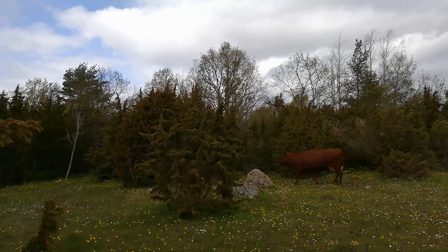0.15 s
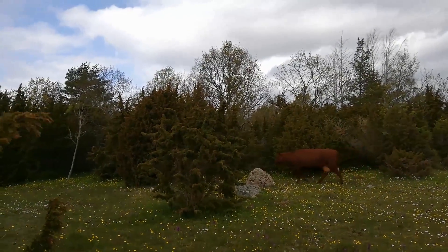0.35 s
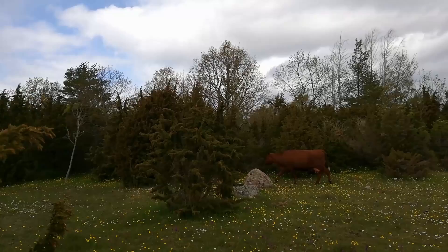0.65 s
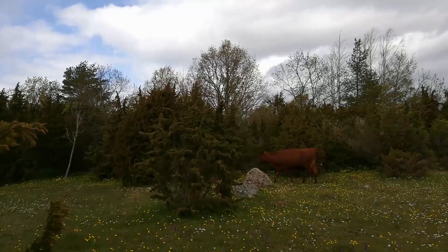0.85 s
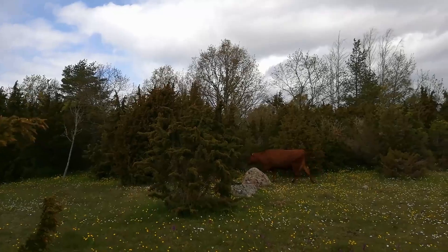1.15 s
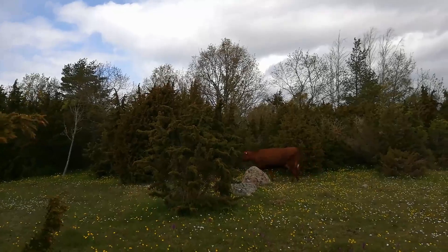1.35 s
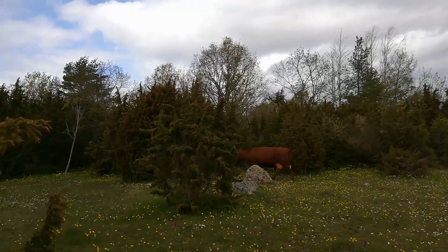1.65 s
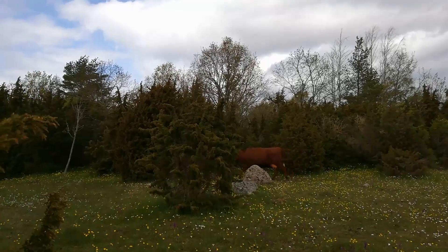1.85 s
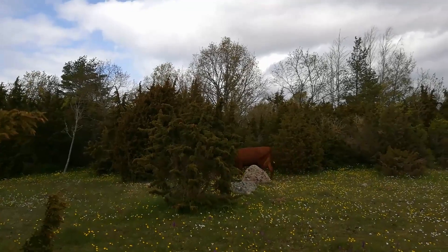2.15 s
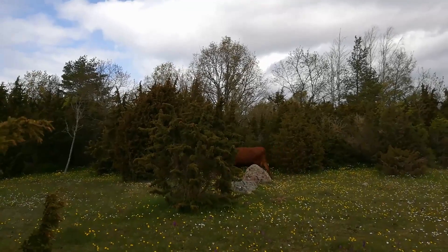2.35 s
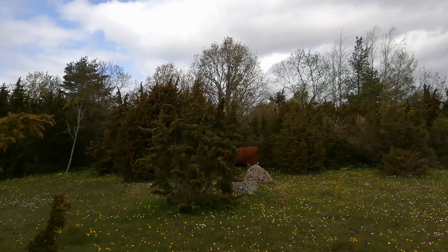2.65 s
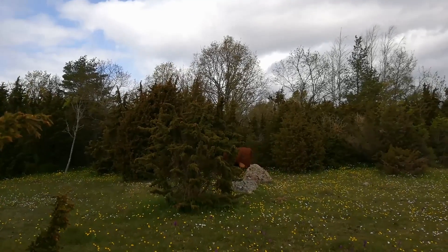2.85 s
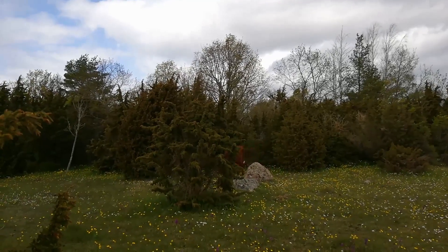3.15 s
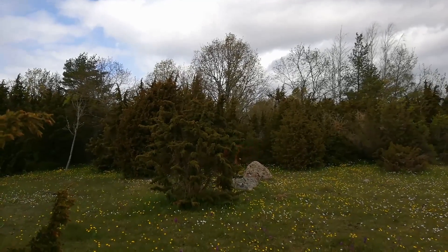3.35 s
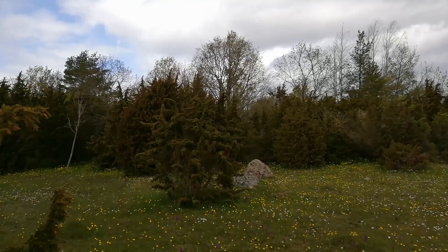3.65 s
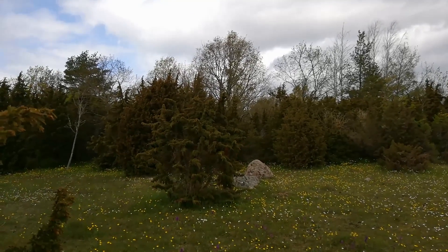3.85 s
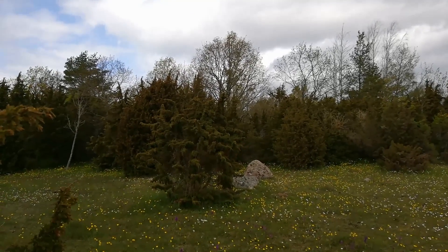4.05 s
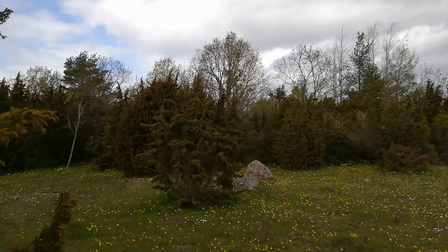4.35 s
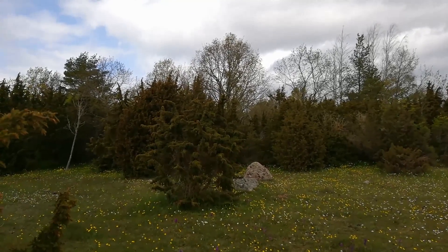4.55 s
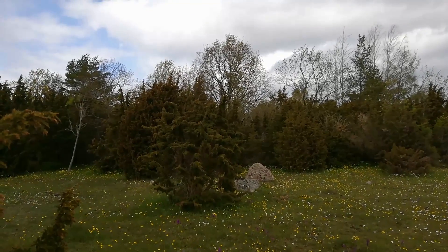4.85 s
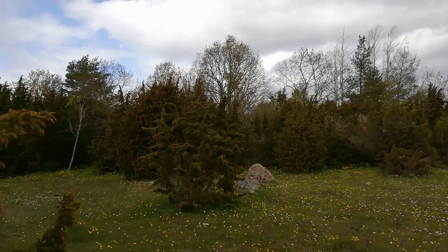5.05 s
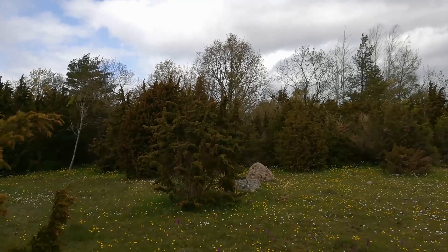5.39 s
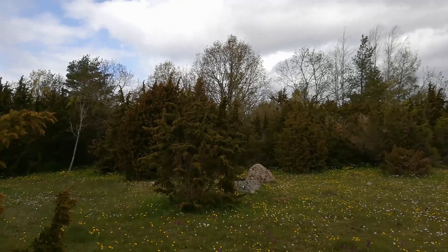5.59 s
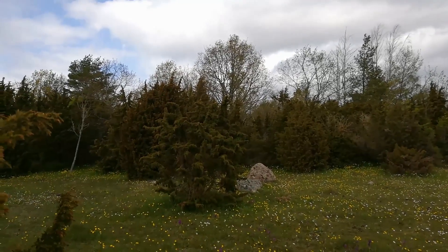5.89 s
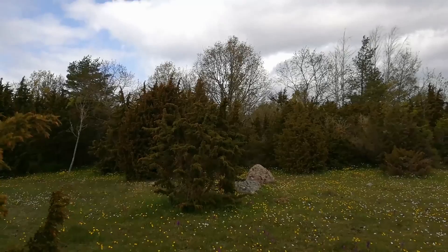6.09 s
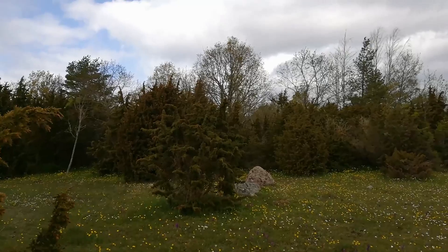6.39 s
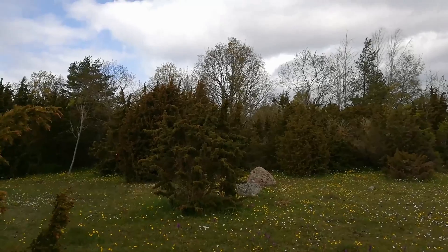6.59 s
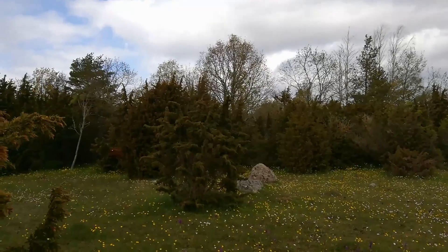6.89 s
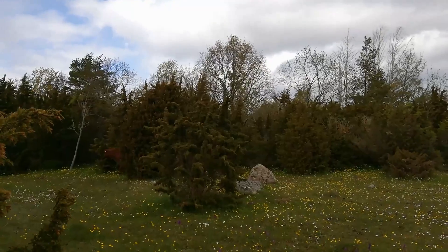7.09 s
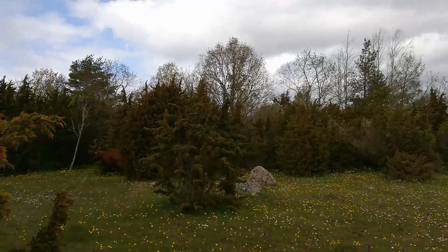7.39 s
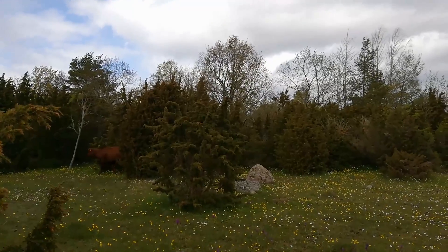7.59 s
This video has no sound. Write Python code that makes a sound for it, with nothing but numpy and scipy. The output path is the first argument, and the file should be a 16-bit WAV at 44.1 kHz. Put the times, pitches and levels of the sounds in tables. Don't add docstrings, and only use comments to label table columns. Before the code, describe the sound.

Several songbirds chirp, whistle and buzz around a shrub-ringed meadow while low buffeting wind and light handling clicks come and go close to the microphone.

```python
import sys
import numpy as np
from scipy import signal
from scipy.fft import rfft, irfft, next_fast_len
from scipy.io import wavfile
from scipy.ndimage import uniform_filter1d

SR = 44100
rng = np.random.default_rng(int(sys.argv[2]) if len(sys.argv) > 2 else 0)


def elevation(decibels):
    levels = np.asarray(decibels, float)
    return 10 ** (levels / 20)


def materialize(psi):
    bounded = np.clip(np.atleast_2d(psi).T, -1, 1)
    quanta = np.round(bounded * 32767).astype(np.int16)
    wavfile.write(sys.argv[1], SR, quanta)


N = 340893

# after_onset_s, pitch_hz, level_db
SLUR_CURVE = [(0, 3400, 1), (.003, 4496, -16), (.006, 4440, -0.5), (.012, 2930, 0), (0.022, 2542, -8),
              (0.092, 2462, -8), (.108, 2313, 12.5), (0.123, 1922, 13), (.133, 1690, -2), (.138, 1700, -33)]
# start_s, level_db, pitch_factor, extra_drop_db
SLURS = [
    (4.24, -63.5, 1.02, 6),
    (4.745, -54.5, 1.004, 3.5),
    (5.235, -53, 1.034, 7),
    (5.704, -54, 1.002, 11),
    (6.184, -52.5, 1.04, 11),
]
# from_peak_s, share_of_rise, level_db
FLICK_CURVE = [(-.036, .01, -22), (-.03, .02, -9), (-.018, .12, -8), (-.009, .42, 1), (0, 1, -4),
               (.006, .5, -4), (.012, .15, -14)]
# peak_s, peak_hz, level_db
FLICKS = [
    (6.707, 4880, -49),
    (6.804, 5120, -43),
    (6.898, 4720, -44),
    (6.991, 4500, -48),
    (7.184, 4590, -43.5),
    (7.278, 4320, -43.5),
    (7.379, 4830, -47.5),
]
# start_s, length_s, start_hz, level_db
BUZZES = [
    (6.61, 0.065, 4220, -56.5),
    (6.737, 0.065, 4270, -52),
    (6.907, 0.036, 3980, -52),
    (7.009, 0.051, 4200, -64),
    (7.028, .07, 4080, -45),
    (7.152, 0.043, 4610, -47),
    (7.168, 0.057, 3950, -47),
]
# start_s, length_s, start_hz, end_hz, level_db
FAST_TRILLS = [(.95, .145, 4060, 4050, -50), (1.085, .04, 4150, 4050, -58), (.93, .18, 4600, 4420, -56.5),
               (.945, .04, 5150, 5100, -57), (.98, .08, 4900, 4800, -64), (6.862, .045, 6950, 6850, -53),
               (7.385, .05, 6850, 6750, -50), (7.435, .05, 6750, 6700, -58), (7.4, .05, 7450, 7400, -58),
               (7.466, .06, 3330, 3220, -52), (7.395, .045, 4400, 4480, -53)]
SLOW_TRILLS = [
    (3.025, .27, 4720, 4430, -52),
    (2.985, .09, 3850, 3350, -55),
    (3.015, .36, 3250, 2980, -52),
    (7.61, .12, 2900, 2900, -52),
]
# start_s, length_s, start_hz, end_hz, level_db
WARBLES = [
    (.935, .175, 3310, 3400, -55),
    (1.1, .035, 3350, 3150, -61),
    (2.055, .115, 3300, 3340, -61),
    (2.39, .145, 3250, 3400, -57.5),
]
FALL = (0.034, -0.2)
HOOK = (0.109, -0.026)
ARCH = (-0.102, -0.072)
RISE = (-0.0824, 0.092)
CHIRP = (.31, -0.21)
DROP = (0.22, -0.53)
TSIP = (0.042, -0.066)
DIP = (.14, 0.06)
CROOK = (-0.032, -0.106)
# start_s, length_s, middle_hz, level_db, sweep
FALLS = [
    (0.594, 0.01, 3450, -58.5, .6),
    (4.168, 0.015, 4150, -64, 0.82),
    (0.855, 0.042, 4580, -60.5, 0.73),
    (3.408, 0.0065, 2930, -58.5, 1.1),
    (6.409, 0.052, 3750, -58.5, 1.23),
    (7.281, 0.03, 3530, -59, 0.77),
    (7.592, 0.0095, 2000, -48.5, 1.5),
    (7.707, 0.0092, 2070, -49.5, 1.9),
]
# start_s, length_s, middle_hz, level_db, sweep
HOOKS = [
    (0.488, 0.036, 4250, -63, 1.5),
    (1.214, 0.034, 3460, -61.5, 0.61),
    (1.391, 0.02, 2930, -59, 0.96),
    (1.961, 0.035, 3160, -59.5, 0.91),
    (6.1, 0.047, 3555, -57, 1.5),
    (7.477, 0.14, 2899, -49, 0.32),
]
# start_s, length_s, middle_hz, level_db, sweep
ARCHES = [
    (3.395, 0.034, 4730, -66.5, 0.7),
    (7.661, 0.043, 3330, -60, 1.1),
    (3.473, 0.057, 3780, -50, 1.8),
    (4.378, 0.034, 4890, -63.5, 0.99),
    (4.5, 0.026, 4750, -59.5, 0.6),
    (7.607, 0.03, 2070, -44.5, 2.1),
]
# start_s, length_s, middle_hz, level_db, sweep
RISES = [
    (0.9, 0.079, 3190, -59, 1.48),
    (6.521, 0.026, 3720, -61, 2.8),
    (6.827, 0.018, 5500, -56.5, 0.57),
    (6.859, .016, 5550, -58, .3),
    (7.356, .018, 5500, -56, 0.4),
    (7.38, .028, 5600, -58, .12),
    (0.908, 0.05, 4100, -62, .5),
    (2.74, .022, 2800, -69, .5),
    (7.65, 0.076, 6360, -66, 1.2),
]
# start_s, length_s, middle_hz, level_db
DIPS = [
    (1.41, 0.082, 2750, -69),
    (2.034, .22, 2677, -63),
]
# start_s, length_s, middle_hz, level_db
CHIRPS = [
    (2.324, 0.064, 3700, -52.5),
    (2.438, 0.051, 3490, -53.5),
    (2.542, 0.04, 3550, -54),
    (2.645, 0.041, 3460, -52),
    (2.753, .05, 3440, -53),
    (2.874, 0.046, 3600, -51.5),
]
# start_s, middle_hz, level_db
DROPS = [
    (0.015, 2570, -44.5),
    (0.213, 2560, -43.5),
]
# start_s, middle_hz, level_db
TSIPS = [
    (1.402, 5400, -68),
    (1.571, 5730, -62),
    (1.655, 5600, -70),
    (1.724, 5680, -64),
    (1.797, 5960, -56.5),
    (1.876, 5570, -61.5),
]
# start_s, middle_hz, level_db
SEEPS = [(2.055, 4740, -65), (2.215, 3970, -63), (2.254, 3420, -61), (3.785, 5000, -69), (6.585, 5500, -69),
         (5.84, 4670, -67), (5.99, 4520, -68), (6.125, 5550, -71), (6.273, 5450, -61.5),
         (6.412, 5500, -66.5), (6.552, 5640, -61.5)]
# start_s, middle_hz, level_db
CROOKS = [
    (6.832, 7200, -56),
    (7.354, 7450, -57),
]
# start_s, middle_hz, level_db
COOS = [
    (6.486, 1654, -53.5),
    (6.549, 1600, -58),
    (7.111, 1610, -59),
    (7.179, 1565, -55.5),
]
DROP_S, TSIP_S, SEEP_S, CROOK_S, COO_S = .015, 0.017, 0.047, 0.079, 0.0392
FAST_PER_S, SLOW_PER_S, BUZZ_PER_S, BUZZ_SAG = 96, 76, 93, .02

# band_hz, t60_s
SHRUB_DECAY = [(1500, 0.49), (3000, 0.44), (6000, 0.57)]
# band_hz, level_db
ECHO_COLOUR = [(1500, 4), (2500, 0.5), (3500, 0.5), (4500, -2.5), (7000, 4.5)]

# full_s, hold_s, strength_db, turbulence_db
GUSTS = [(0, 0.043, -23.5, 9.5), (0.069, .17, -23, 4.5), (0.285, 0.32, -31, 13.5), (0.352, 0.048, -20, 4.5),
         (0.486, 0.02, -18, 11.5), (0.67, 0.037, -28.5, 0.5), (0.793, 0.032, -39.5, -7),
         (1.093, 0.013, -42, -6), (1.547, .01, -48, -17), (1.766, 0.014, -44, -18),
         (4.217, 0.059, -36.5, -12), (4.506, 0.048, -45, -22), (4.64, 0.0065, -38, -6),
         (4.892, 0.008, -42.5, -20), (5.024, .01, -39, -17), (5.184, 0.095, -41.5, -4.5),
         (5.35, 0.12, -40, -10.5), (5.524, 0.13, -37, -10), (5.78, 0.098, -36, -23),
         (6.098, 0.0054, -36.5, -17), (6.207, 0.011, -44, 12.5), (6.248, 0.046, -38, -11),
         (6.504, 0.0081, -43.5, -13), (6.675, 0.13, -37.5, 2.5), (6.865, 0.098, -31, -7.5),
         (7.238, 0.009, -45.5, -25), (7.351, 0.09, -42, -26), (7.42, 0.053, -46.5, -2.5)]
RISE_DB_PER_S, FALL_DB_PER_S, EDDY_STEEPER, CALM_BUFFET_DB = 307, 277, 1.68, -64
# time_s, level_db
BREEZE = [(.85, -53), (1.05, -49), (1.28, -61), (2.07, -60), (3.11, -59), (3.58, -56), (4.03, -69),
          (4.16, -58.5), (7.05, -54), (7.5, -48), (7.73, -56)]
# band_hz, density_db
RUMBLE = [(11, -32), (18, -2), (43, -3), (65, -1), (81, -3), (108, -8.5), (160, -16), (210, -52),
          (350, -120)]
BUFFET = [(50, -37.5), (90, 1.5), (130, -2.5), (190, -0.5), (260, -7.5), (420, -20), (700, -39),
          (1300, -61), (2500, -83)]
# band_hz, lead_rad
WIND_LEAD = [(0, 0), (600, 3.2), (1900, 6.2), (2600, 9.5), (22050, 30)]
# start_s, peak_db, pitch_hz
THUMPS = [(0.106, 2.5, 110), (0.162, -5, 137), (0.233, 2.5, 99), (0.348, 8, 172), (0.429, 1.5, 73.6),
          (0.492, 4, 140), (4.655, -15.5, 113), (5.208, -12.5, 142), (5.435, -11, 104), (6.196, -21, 170),
          (6.769, -11, 79), (7.429, -17.5, 97)]
# start_s, peak_db, length_ms
KNOCKS = [
    (0.003, -22.5, 2),
    (0.044, -19.5, 8.2),
    (0.065, -16.5, 5.8),
    (0.236, -34, 0.87),
    (0.353, -11, 7.5),
    (0.372, -18, 2.5),
    (0.38, -7, 3.7),
    (0.442, -29.5, 3.4),
    (0.492, -24.5, 5),
]
# band_hz, density_db
KNOCK_COLOUR = [(150, 5), (400, 20), (900, 4), (1600, -15.5), (2600, -46), (4500, -57)]

# start_s, peak_db, length_ms
TICKS = [(1.4765, -39, 0.64), (1.745, -39, 0.91), (1.7754, -36.5, 4.7), (1.7954, -38, 0.86),
         (1.8918, -37, 2), (1.936, -33.5, 1.2), (1.996, -25.5, 1.5), (2.0277, -28, 1.5),
         (2.1375, -25.5, 0.12), (2.1703, -50, 2.2), (2.251, -43, 3), (2.7358, -43, 2.8), (2.9373, -41, 1.9),
         (3.1057, -38, 0.44)]
TICK_LOW_DB = -60
# start_s, peak_db, length_ms, below_5khz_db
SCRAPES = [(.602, -54, 1.5, -13), (.751, -51, 1.5, -27), (.834, -48, 1.7, -29.5), (0.867, -45, 1.5, -30),
           (.927, -48, 1.4, -30), (1.266, -50.5, 2.2, -32), (1.961, -44, 2.5, -20), (2.788, -52, 1.5, -30),
           (3.046, -52, 1.5, -30), (4.914, -45.5, 2.2, -21), (5.0222, -47.5, 2.4, -17.5),
           (.203, -47, 14, -23), (0.923, -52.5, 28, -24), (1.392, -38.5, 1.05, -12.5),
           (5.617, -61, 1.8, -2.5), (1.466, -59.5, 22, -31), (2.0384, -30, 6.8, -25),
           (2.195, -44, 17.5, -21.5)]
# time_s, level_db
RUSTLE = [
    (0.0, -66.5),
    (0.39, -66),
    (1.96, -78),
    (1.99, -74),
    (2.4, -87.5),
]
# centre_hz, width_hz, level_db
HOUSING_MODES = [(5600, 4650, 0), (8930, 1630, -8), (14600, 1800, -3.5)]

# band_hz, density_db
AIR = [(15, -35), (25, -8), (170, -0.5), (200, -10), (317, -1.5), (489, -9.5), (677, -8), (754, -4),
       (863, -6), (2000, -10.5), (3620, -16.5), (4370, -17.5), (6380, -20), (9570, -19.5), (16000, -32.5)]
AIR_DB = -58.5
# band_hz, likeness
SAME = [(60, 1), (180, 1), (550, -0.34), (1650, 0.021), (4970, -0.057), (15000, -0.016)]
# time_s, level_db
AIR_SWELL = [(0.0, 2.5), (7.73, -1.3)]
# band_hz, left_over_right_db
PORTS = [(150, 0.5), (400, 2.5), (900, 9), (2000, -0.5), (3000, -2), (4500, -7.5), (7000, 1.5), (9500, 19),
         (14000, -6)]


def evened(x):
    return x / np.sqrt(np.mean(x ** 2) + 1e-20)


def read(points, hz):
    f, value = np.transpose(points)
    return np.interp(np.log(hz + 1), np.log(f + 1), value)


def colour(x, points, share=1):
    size = next_fast_len(N + 4096)
    gain = elevation(share * read(points, np.fft.rfftfreq(size, 1 / SR)))
    return irfft(rfft(x, size) * gain, size)[..., :N]


def add(mix, s, sound, lag=0):
    for port, shift in enumerate((0, lag)):
        part = mix[port, max(round(s * SR) + shift, 0):][:len(sound)]
        part += sound[:len(part)]


def lumps(seconds):
    width = round(seconds * SR)
    once = uniform_filter1d(rng.standard_normal(N), width)
    return evened(uniform_filter1d(once, width))


def tone(hz):
    return np.sqrt(2) * np.sin(2 * np.pi * np.cumsum(hz) / SR)


def slur(db, pitch, drop_db):
    s, hz, shape_db = np.transpose(SLUR_CURVE)
    t = np.arange(0, s[-1], 1 / SR)
    level_db = db + np.interp(t, s, shape_db) + drop_db * (t < .03)
    return elevation(level_db) * tone(pitch * np.interp(t, s, hz))


def flick(peak_hz, db):
    s, share, shape_db = np.transpose(FLICK_CURVE)
    t = np.arange(s[0], s[-1], 1 / SR)
    db = db + np.minimum(t, 0) * max(peak_hz - 4800, 0) * 3
    hz = 3500 + (peak_hz - 3500) * np.interp(t, s, share)
    return elevation(db + np.interp(t, s, shape_db)) * tone(hz)


def whistle(shape, length, middle_hz, db, sweep=1):
    u = np.linspace(0, 1, round(length * SR))
    bend = shape[0] * (1 - u) * (1 - 2 * u) + shape[1] * u * (2 * u - 1)
    hz = middle_hz * (1 + sweep * bend)
    breath = np.convolve(rng.standard_normal(len(u)), np.hanning(300))
    waver = evened(breath[150:150 + len(u)])
    return elevation(db + 1.6 * waver) * tone(hz) * signal.windows.tukey(len(u), min(.5, .03 / length))


def trill(length, start_hz, end_hz, rate, db, sweep_hz, depth, fade_db, rough_db, voices=1, upper=0):
    u = np.linspace(0, 1, round(length * SR))
    out = 0
    for side in range(voices):
        turns = (rate * length * u + side) / voices
        strength, shift = rng.standard_normal((2, 60))[:, turns.astype(int)]
        gate = 1 - np.clip(depth, 0, 1) * np.cos(np.pi * turns) ** 2
        fall = np.cos(np.pi * (turns % 1)) / 2 + 0.0744 * shift
        hz = start_hz + (end_hz - start_hz) * u + sweep_hz * fall
        rasp = evened(np.convolve(rng.standard_normal(len(u)), np.hanning(90), "same"))
        level_db = db + 0.72 * strength + rough_db * rasp - fade_db * u
        out = out + elevation(level_db) * gate * (tone(hz) + upper * tone(hz + 1050))
    return out * signal.windows.tukey(len(u), .3)


def birds():
    singer, others = np.zeros((2, 2, N))
    for s, *note in SLURS:
        add(singer, s, slur(*note), lag=-4)
    for shape, notes in ((FALL, FALLS), (HOOK, HOOKS), (ARCH, ARCHES), (RISE, RISES), (DIP, DIPS), (CHIRP, CHIRPS)):
        for s, *note in notes:
            add(others, s, whistle(shape, *note), lag=rng.integers(-4, 5))
    for shape, length, sweep, notes in ((DROP, DROP_S, 1, DROPS), (TSIP, TSIP_S, 1, TSIPS), (HOOK, SEEP_S, .5, SEEPS),
                                        (CROOK, CROOK_S, 1, CROOKS), (FALL, COO_S, 1, COOS)):
        for s, hz, db in notes:
            add(others, s, whistle(shape, length, hz, db, sweep), lag=rng.integers(-4, 5))
    for rate, fade_db, notes in ((FAST_PER_S, 4, FAST_TRILLS), (SLOW_PER_S, 10, SLOW_TRILLS)):
        for s, length, start_hz, end_hz, db in notes:
            note = trill(length, start_hz, end_hz, rate, db, sweep_hz=320, depth=.92, fade_db=fade_db, rough_db=1)
            add(others, s, note, lag=-3)
    for s, length, start_hz, end_hz, db in WARBLES:
        note = trill(length, start_hz, end_hz, FAST_PER_S, db, sweep_hz=130, depth=.5, fade_db=3, rough_db=1.5)
        add(others, s, note, lag=-3)
    for s, length, hz, db in BUZZES:
        note = trill(length, hz, hz * (1 - BUZZ_SAG), BUZZ_PER_S, db, sweep_hz=1050, depth=1, fade_db=0,
                     rough_db=2.7, voices=2, upper=.22)
        add(others, s, note, lag=-3)
    for s, *note in FLICKS:
        add(others, s + FLICK_CURVE[0][0], flick(*note), lag=-3)
    flutter = elevation(0.6 * np.array([lumps(0.0019), lumps(0.0015)]))
    return singer * flutter, others * flutter


def leaves(x):
    t = np.arange(6000) / SR
    tail = rng.standard_normal((2, len(t))) * elevation(-60 * t / 0.19) * (t > .002)
    return signal.oaconvolve(x, tail / np.linalg.norm(tail[0]), axes=1)[:, :N]


def shrubs(x):
    taps = np.zeros((2, SR // 2))
    at = np.arange(300, SR // 2 - 20, 20) + rng.integers(0, 20, (2, (SR // 2 - 301) // 20))
    np.put_along_axis(taps, at, rng.choice([-1., 1.], at.shape), 1)
    hz, t, z = signal.stft(taps, SR, nperseg=256)
    ring = 1 - np.exp(-(t / 0.031) ** 2) + 0.25 * np.exp(-((t - .075) / 0.031) ** 2)
    decay = elevation(-60 * t / read(SHRUB_DECAY, hz)[:, None])
    tail = signal.istft(z * ring * decay, SR, nperseg=256)[1]
    return signal.fftconvolve(x, tail / np.linalg.norm(tail[0]), axes=1)[:, :N]


def gusts():
    t = np.arange(0, N / SR + .002, .001)
    s, hold, db, eddy_db = np.transpose(GUSTS)[..., None]
    below_db = RISE_DB_PER_S * np.maximum(s - t, 0) + FALL_DB_PER_S * np.maximum(t - s - hold, 0)
    breeze = elevation(np.interp(t, *np.transpose(BREEZE)))
    rumble = np.maximum(elevation(db - below_db).max(0), breeze)
    buffet = np.maximum(elevation(db + eddy_db - EDDY_STEEPER * below_db).max(0), elevation(CALM_BUFFET_DB))
    return [np.interp(np.arange(N) / SR, t, gain) for gain in (rumble, buffet)]


def knocks():
    mix, u = np.zeros((2, N)), np.arange(600) / SR
    for s, db, ms in KNOCKS:
        burst = rng.standard_normal(len(u)) * np.exp(-u / (ms / 2000))
        add(mix, s, elevation(db) * burst / np.linalg.norm(burst))
    return elevation(26.5) * colour(mix, KNOCK_COLOUR)


def trailing(x):
    size = next_fast_len(N + 4096)
    lag_rad = np.interp(np.fft.rfftfreq(size, 1 / SR), *np.transpose(WIND_LEAD))
    return irfft(rfft(x, size) * np.exp(-1j * lag_rad), size)[:N]


def wind():
    push, eddies = gusts()
    pressure = np.array([[1, 0.046], [1, 0.18]]) @ rng.standard_normal((2, N))
    rumble = evened(colour(pressure, RUMBLE)) * push * elevation(2.66 * lumps(0.014))
    shared, own = rng.standard_normal((2, N)) * eddies * elevation(4.83 * lumps(0.0089))
    scale = np.sqrt(np.mean(colour(rng.standard_normal(N), BUFFET) ** 2))
    buffet = colour(np.array([shared, shared + 0.29 * own]), BUFFET) * elevation(-6.5) / scale
    mix = buffet + rumble + knocks()
    u = np.arange(2600) / SR
    for s, db, hz in THUMPS:
        add(mix, s, elevation(db - 11.0) * np.sin(2 * np.pi * hz * u) * np.exp(-((u - .009) / 0.0052) ** 2))
    return np.array([mix[0], trailing(mix[1])])


def band(x, lo_hz, hi_hz):
    return signal.sosfilt(signal.butter(3, [lo_hz, hi_hz], "band", fs=SR, output="sos"), x)


def housing():
    high, low = np.zeros((2, 2, N))
    u = np.arange(1200) / SR
    ticks = [(s, db, ms, min(TICK_LOW_DB - db, -13)) for s, db, ms in TICKS]
    for s, db, ms, low_db in ticks + SCRAPES:
        common, left, right = rng.standard_normal((3, len(u)))
        shape = np.exp(-(u / (ms / 1500)) ** 2)
        bursts = np.array([common + 2.4 * left, common + 3.5 * right]) * shape
        bursts *= np.linalg.norm(shape) / np.linalg.norm(bursts, axis=1, keepdims=True)
        at = round(s * SR)
        high[:, at:at + len(u)] += elevation(db) * bursts
        low[:, at:at + len(u)] += elevation(db + low_db) * bursts
    edge = high.copy()
    s, db = np.transpose(RUSTLE)
    rustle_db = np.interp(np.arange(N) / SR, s, db, right=-120) + 1.8 * lumps(0.0063)
    high += rng.standard_normal((2, N)) * elevation(rustle_db)
    rung = 0
    for hz, width, db in HOUSING_MODES:
        rung = rung + elevation(db) * signal.lfilter(*signal.iirpeak(hz, hz / width, SR), high)
    body = elevation(4.5) * band(rung, 4870, 11100)
    return body + elevation(-12.5) * band(edge, 12000, 16400) + elevation(23.5) * band(low, 2430, 6060)


def air():
    frames, hz = N // 256 + 5, np.fft.rfftfreq(1024, 1 / SR)
    a, b, c, d, patches = rng.standard_normal((frames, 513, 5)).T
    patches = evened(uniform_filter1d(uniform_filter1d(patches, 12, 0), 14, 1))
    same = np.clip(read(SAME, hz), -1, 1)[:, None]
    left = a + 1j * b
    right = same * left + np.sqrt(1 - same ** 2) * (c + 1j * d)
    z = np.array([left, right]) * elevation(read(AIR, hz)[:, None] + 1.17 * patches)
    z *= hz[:, None] < 15450
    return elevation(AIR_DB) * evened(signal.istft(z, nperseg=1024, noverlap=768)[1][:, :N])


def ports(x, share):
    return np.array([colour(x[0], PORTS, share / 2), colour(x[1], PORTS, -share / 2)])


def scene():
    singer, others = birds()
    echoes = shrubs(colour(elevation(-9.5) * singer + elevation(-13.5) * others, ECHO_COLOUR))
    echoes += leaves(elevation(-6.5) * singer + elevation(-6) * others)
    swell = elevation(np.interp(np.arange(N) / SR, *np.transpose(AIR_SWELL)))
    return ports(singer + others + wind() + housing(), 0.98) + echoes + ports(swell * air(), 0.26)


def low_pass(x):
    return signal.sosfilt(signal.butter(12, 16430, fs=SR, output="sos"), x)


def record(dry):
    power_db = 10 * np.log10(abs(uniform_filter1d((dry ** 2).mean(0), 800)) + 1e-12)
    fall_db = np.arange(N) * 52.0 / SR
    held_db = np.maximum.accumulate(power_db + fall_db) - fall_db
    over_db = np.maximum(held_db + 23.5, 0)
    ducked = dry / elevation(0.38 * uniform_filter1d(over_db, 400))
    ducked *= np.minimum(np.arange(N) / 100, 1)
    limited = .6 * np.tanh(ducked / .6)
    narrow = signal.oaconvolve(limited, signal.firwin(127, 16300, fs=SR)[None], "same")
    return low_pass(narrow)


dry = scene()
out = record(dry)
materialize(out)
```